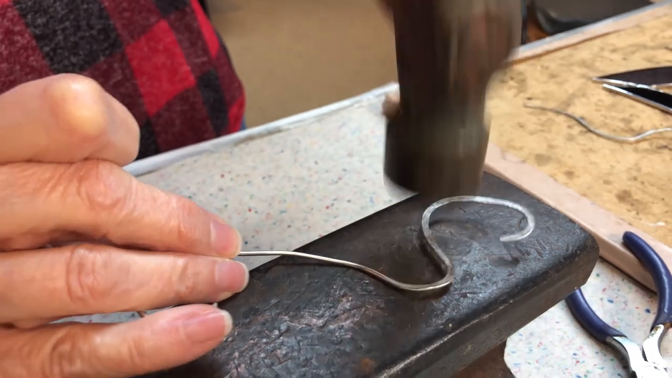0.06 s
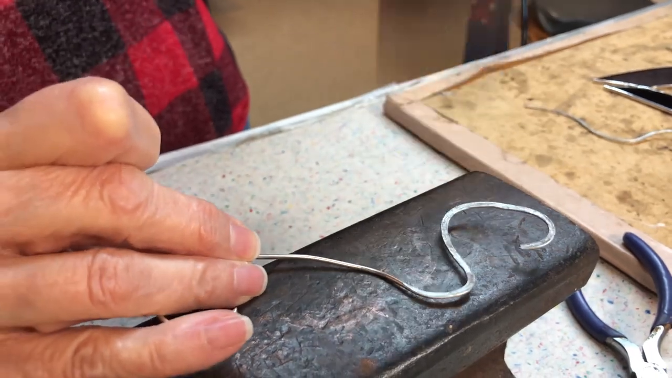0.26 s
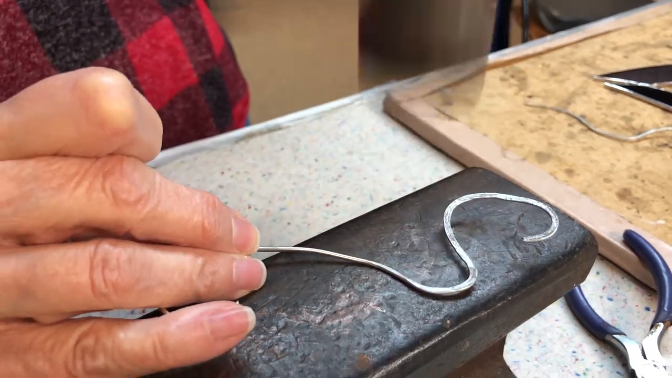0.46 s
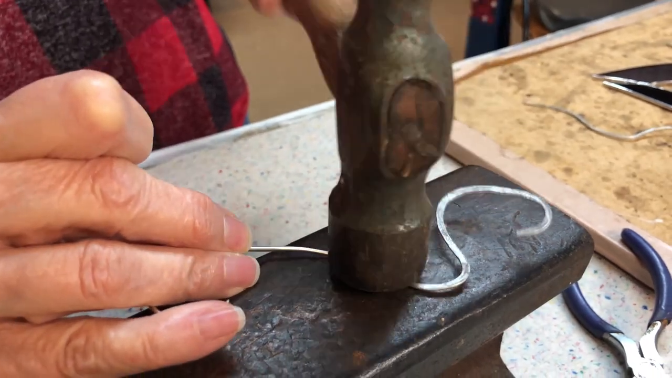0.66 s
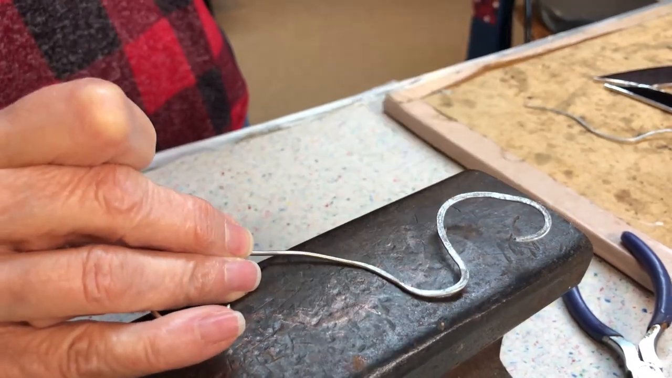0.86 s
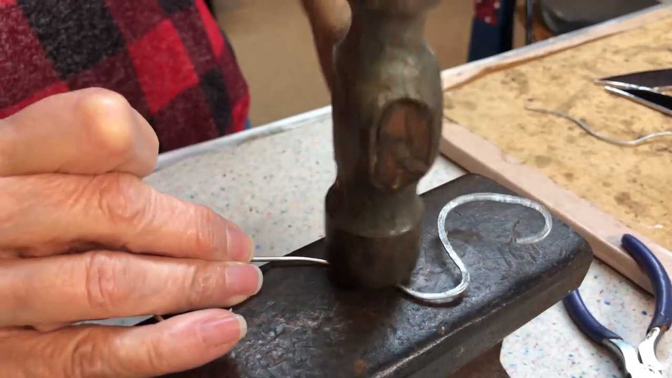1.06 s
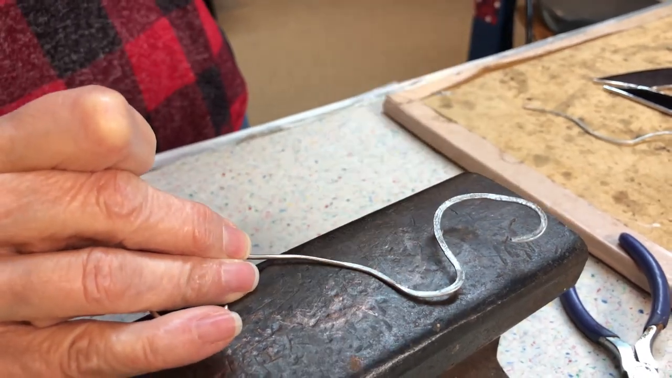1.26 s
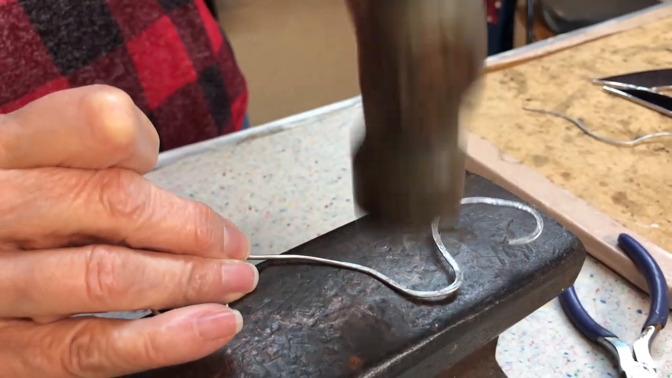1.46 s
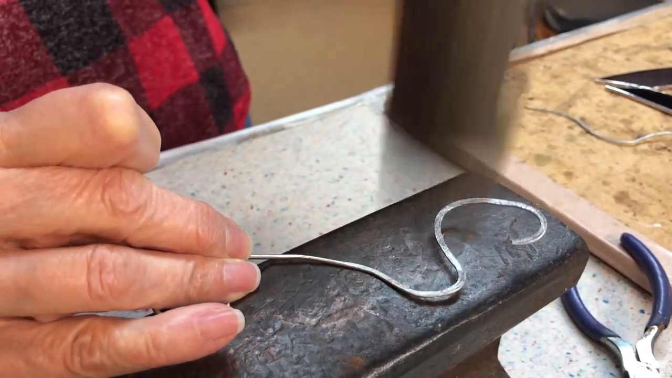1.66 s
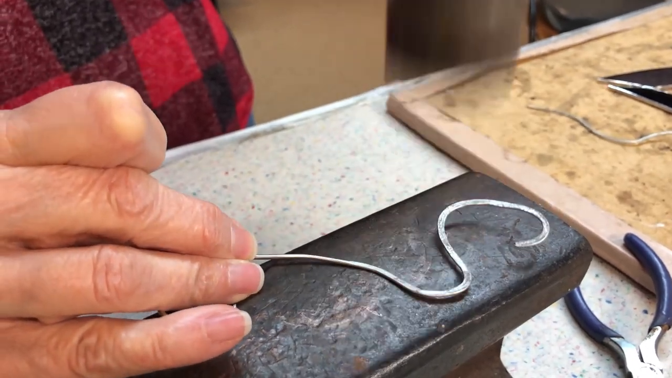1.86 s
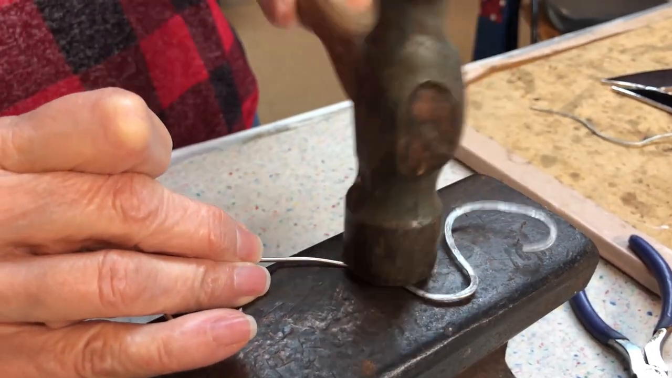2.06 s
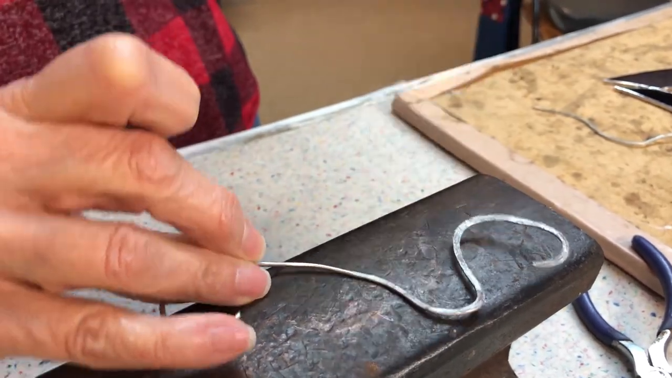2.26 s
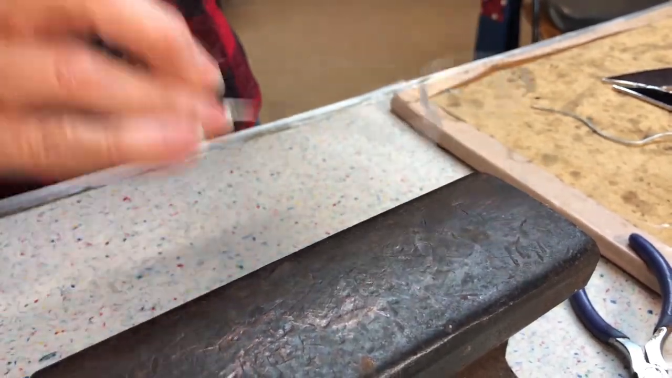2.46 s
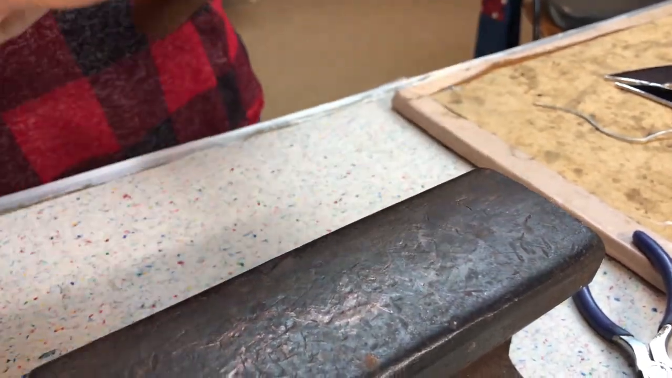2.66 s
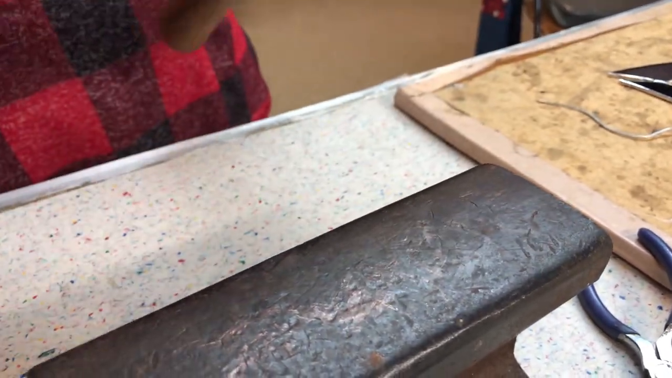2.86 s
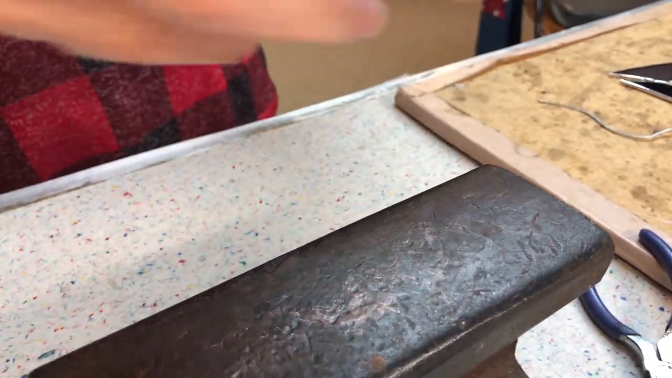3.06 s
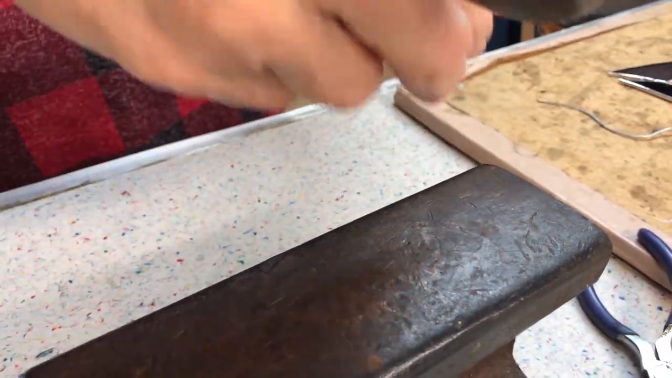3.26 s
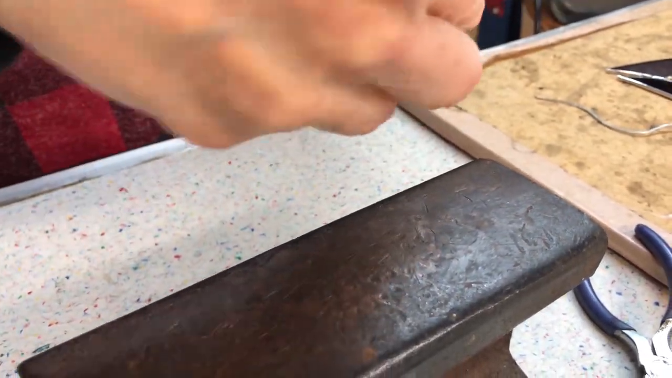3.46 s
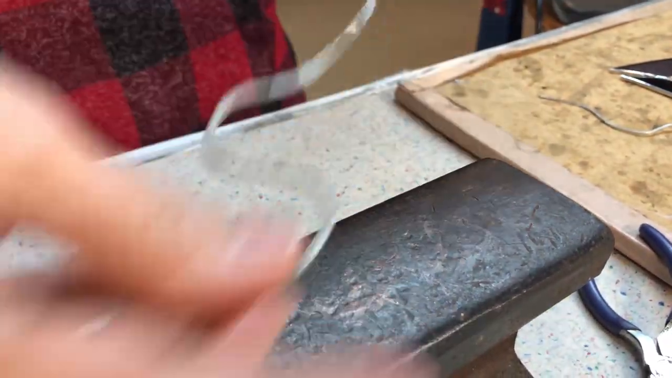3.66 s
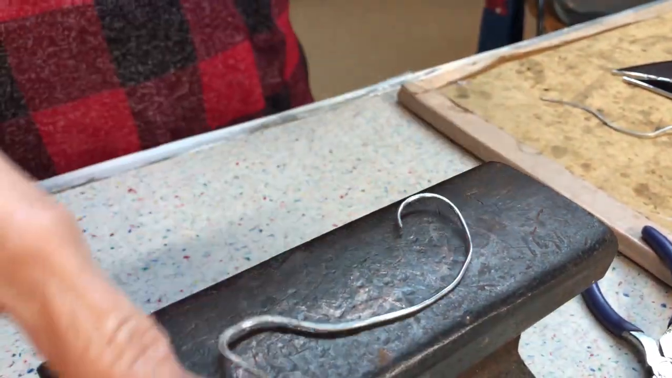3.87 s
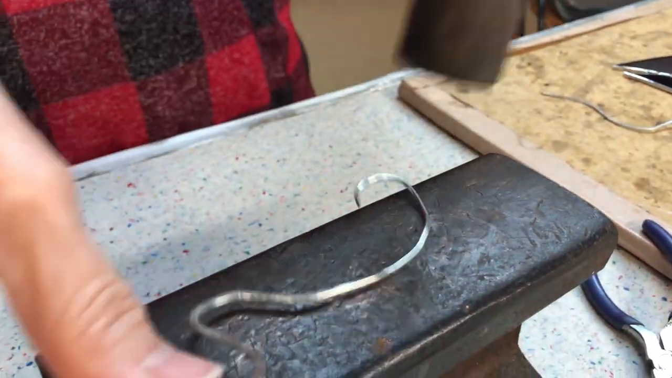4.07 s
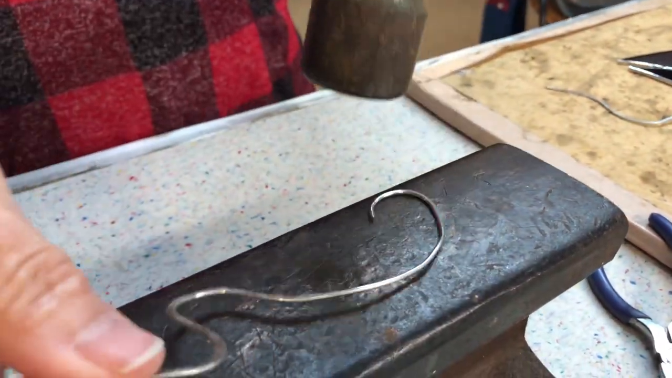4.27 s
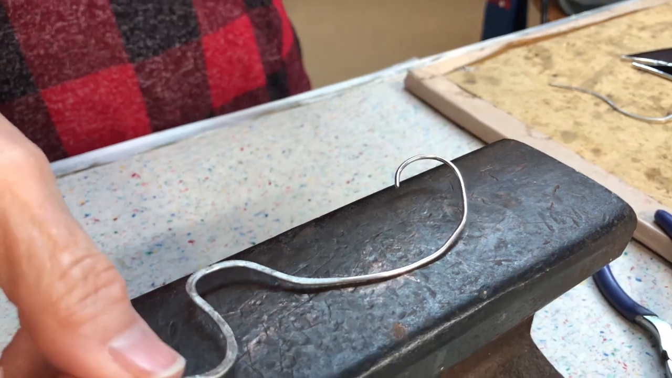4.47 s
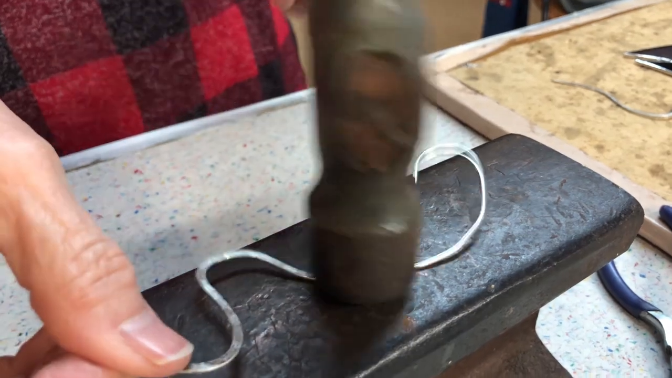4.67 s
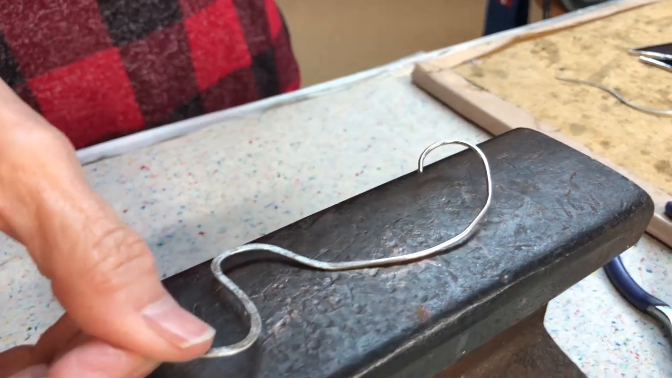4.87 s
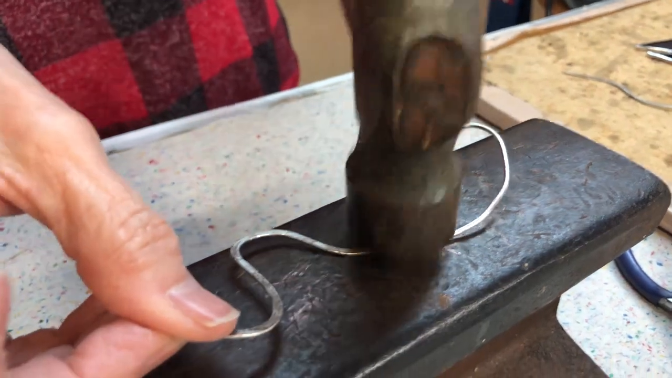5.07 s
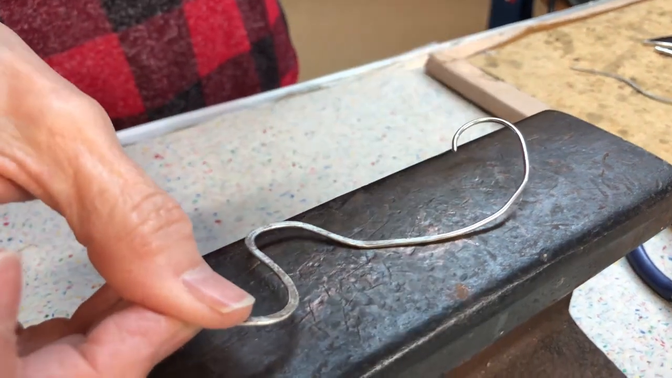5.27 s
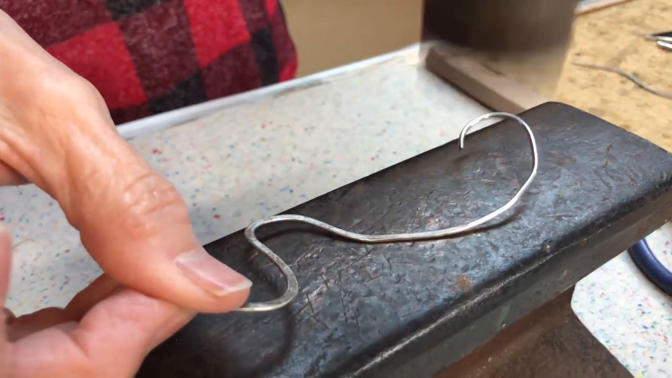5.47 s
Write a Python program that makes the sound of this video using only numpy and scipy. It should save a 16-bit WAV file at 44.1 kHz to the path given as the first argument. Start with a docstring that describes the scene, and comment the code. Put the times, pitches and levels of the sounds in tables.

```python
"""Hammering copper wire on a steel rail

A hammer flattens copper wire on a short steel rail that lies on a workbench, in a small room.
Each blow is a noise burst (the crack) with damped modes (the steel) and reverberation (the room).
The rail hops on the bench top, which booms as damped modes, and loose metal rattles in noise bursts.
In the pause the wire is lifted, turned round and slid back: ticks, gritty strokes and soft knocks.
"""
import sys
import numpy as np
from scipy import signal
from scipy.fft import rfft, irfft, next_fast_len
from scipy.io import wavfile
from scipy.ndimage import uniform_filter1d

SR = 44100
rng = np.random.default_rng(int(sys.argv[2]) if len(sys.argv) > 2 else 0)


def persist_wave(psi):
    """Save psi, clipped to +-1, as 16-bit WAV."""
    counts = np.round(np.clip(psi, -1, 1) * 32767).astype(np.int16)
    wavfile.write(sys.argv[1], SR, np.atleast_2d(counts).T)


N = 243431
T = np.arange(SR // 2) / SR  # time since a contact, s


def amp(db):
    """Level in decibels to amplitude ratio."""
    return 10 ** (np.asarray(db) / 20)


def unit(x):
    """Normalisation to an rms of 1."""
    return x / np.sqrt(np.mean(x ** 2) + 1e-20)


def along(points, hz):
    """Linear interpolation of (f/Hz, value) points over logarithmic frequency."""
    f, value = np.transpose(points)
    return np.interp(np.log(hz + 1), np.log(f + 1), value)


def fade(t, t60):
    """Exponential decay: the level falls by 60 dB in t60 seconds."""
    return np.exp(-np.log(1000) * t / t60)


def add(track, s, sound):
    """Superposition: the sound joins the track at s seconds, cut at both ends of the track."""
    start = int(round(s * SR))
    part = sound[max(-start, 0):max(N - start, 0)]
    track[max(start, 0):][:len(part)] += part


def noise(spectrum, size):
    """Spectral shaping: white noise filtered to a given spectrum, with an rms of 1."""
    hz = np.fft.rfftfreq(size, 1 / SR)
    white = rfft(rng.standard_normal(size))
    return unit(irfft(white * amp(along(spectrum, hz)), size))


def burst(spectrum, hold, t60):
    """Contact noise: it holds while the surfaces crush (hold, s), then decays exponentially."""
    grit = noise(spectrum, len(T))
    envelope = fade(np.maximum(T - hold, 0), t60)
    shaped = grit * envelope
    # equal energy for every draw of the noise
    return shaped / np.sqrt(np.sum(shaped ** 2) / np.sum(envelope ** 2))


def ring(modes, scatter_db):
    """Modal superposition: decaying sinusoids, with strengths drawn anew at each call."""
    out = np.zeros(len(T))
    for hz, db, t60 in modes:
        strength = amp(db + scatter_db * rng.standard_normal())
        out += strength * np.sin(2 * np.pi * hz * T) * fade(T, t60)
    return out


def wavering_ring(modes, depth, rate, direct, build):
    """Modes swelling as reflections arrive, with random slow modulation of level and phase."""
    hz, db, t60 = np.transpose(modes)[:, :, None]
    knots = depth * rng.standard_normal((2, len(modes), 128))  # rate: knots per second
    in_phase, across = (np.array([np.interp(T * rate, np.arange(len(k)), k) for k in part])
                        for part in knots)
    phase = 2 * np.pi * hz * T
    tones = (1 + in_phase) * np.sin(phase) + across * np.cos(phase)
    swell = 1 - (1 - direct) * np.exp(-(T / build) ** 2)  # direct: share present at once
    return swell * np.sum(amp(db) * fade(T, t60) * tones, axis=0)


# reverberation of the small room: f/Hz, T60/s
ROOM_DECAY = [(80, .42), (200, .45), (500, 0.39), (1200, 0.3), (3000, 0.25), (6500, 0.18), (9000, .18),
              (15000, 0.09)]


def echo(spectrum, build):
    """Reverberation: reflections build up (build, s), then each band decays, the treble fastest."""
    hz, t, z = signal.stft(noise(spectrum, len(T)), SR, nperseg=512)
    decay = fade(t, along(ROOM_DECAY, hz)[:, None])
    tail = signal.istft(z * decay, SR, nperseg=512)[1][:len(T)]
    return tail * (1 - np.exp(-(T / build) ** 2))


# echo spectrum that every contact excites: f/Hz, relative level/dB
ECHO_SPECTRUM = [(40, -12.5), (80, 15.5), (160, 16), (260, 11), (400, 6), (700, 3), (1200, -2.5),
                 (2050, -0.5), (2700, -5.5), (5500, -4.5), (8200, -4), (11000, -7.5), (15200, -17.5),
                 (17000, -37)]


def contacts(events, spectrum, hold, t60, gain_db, echo_db):
    """Impact excitation: small short bursts, each exciting the same weak reverberation."""
    out = np.zeros(N)
    room = amp(echo_db) * echo(ECHO_SPECTRUM, build=.008)
    for s, db in events:
        add(out, s, amp(db + gain_db) * (burst(spectrum, hold, t60) + room))
    return out


# spectrum of the rumble: f/Hz, relative level/dB
RUMBLE_SPECTRUM = [(15, -21.5), (30, -14.5), (76, 2), (150, 1.5), (236, -3.5), (416, -11), (775, -25),
                   (1200, -34), (2200, -37), (4600, -40), (16000, -46.5)]
# spectrum of the hands and sleeves: f/Hz, relative level/dB
SLEEVE_SPECTRUM = [(200, -1), (700, 3.5), (1500, -3), (4000, -10), (10000, -13), (15500, -15),
                   (17000, -29.5)]
# sleeve hiss at its usual level (dB), at its faintest (dB), and the time to change over (s)
USUAL_DB, FAINT_DB, SETTLE_S = -73.5, -86, 0.65
FAINT_FROM_S, FAINT_TO_S = 2.7, 2.84  # the sleeve hiss is faintest here


def room_tone(rumble_db):
    """Stationary noise: a steady low rumble; a faint hiss of hands and sleeves sinks once."""
    t = np.arange(N) / SR
    turns = [FAINT_FROM_S - SETTLE_S, FAINT_FROM_S, FAINT_TO_S, FAINT_TO_S + SETTLE_S]
    rustle_db = np.interp(t, turns, [USUAL_DB, FAINT_DB, FAINT_DB, USUAL_DB])
    rumble = amp(rumble_db) * noise(RUMBLE_SPECTRUM, N)
    return rumble + amp(rustle_db) * noise(SLEEVE_SPECTRUM, N)


# soft knocks of handling: t/s, relative level/dB, resonance f/Hz
KNOCKS = [(2.492, -58, 1400), (2.737, -63, 2200), (2.95, -55, 1198), (3.516, -50.5, 1800),
          (3.785, -56.5, 2380), (4.059, -49.5, 1000)]
# spectrum of a knock: f/Hz, relative level/dB
KNOCK_SPECTRUM = [(200, -10), (800, -2), (1300, 2), (2000, 1), (2700, -4), (4000, -10), (9000, -14),
                  (16000, -31)]


def knocks(gain_db, tone_db, ring_t60, echo_db):
    """Resonance: dull contacts, each exciting one short mode of the thing touched."""
    events = [(s, db) for s, db, _ in KNOCKS]
    out = contacts(events, KNOCK_SPECTRUM, hold=0.0011, t60=0.018, gain_db=gain_db, echo_db=echo_db)
    for s, db, hz in KNOCKS:
        add(out, s, ring([(hz, db + tone_db, ring_t60)], scatter_db=0.5))
    return out


# the wire touching the rail: t/s, relative level/dB
TICKS = [(3.8926, -37.5), (4.0664, -47.5), (4.0806, -39), (4.1385, -53.5), (4.1949, -55), (4.2138, -53.5),
         (4.3221, -51.5)]
# spectrum of wire on steel, for ticks and strokes: f/Hz, relative level/dB
WIRE_CONTACT_SPECTRUM = [(800, -35.5), (2100, -3), (5000, -4.5), (7800, -4), (9500, 1.5), (12500, 0.5),
                         (15500, -1.5), (17000, -24.5)]


def ticks(gain_db, echo_db):
    """Light impact: the wire touches the rail in brief, bright bursts."""
    return contacts(TICKS, WIRE_CONTACT_SPECTRUM, hold=0.0019, t60=0.011,
                    gain_db=gain_db, echo_db=echo_db)


# the wire sliding on the rail: t/s, length/s, relative level/dB
DRAGS = [(3.509, 0.032, -64.5), (3.95, 0.034, -47.5), (4.105, 0.038, -62.5), (4.286, 0.031, -62.5)]


def drags(gain_db, grain_db):
    """Friction noise: the wire scrapes over pitted steel, whose grain modulates short strokes."""
    out = np.zeros(N)
    for s, length, db in DRAGS:
        stroke = np.minimum(T / 0.006, 1) * fade(np.maximum(T - length, 0), 0.098)
        pits = unit(uniform_filter1d(rng.standard_normal(len(T)), size=60))
        scrape = unit(amp(grain_db * pits) * noise(WIRE_CONTACT_SPECTRUM, len(T)))
        add(out, s, amp(db + gain_db) * stroke * scrape)
    return out


# the bent wire's own modes: f/Hz, relative level/dB, T60/s
WIRE_MODES = [(2050, 1, .14), (2700, 0, .1), (3600, -2, .08), (5300, 0, .1), (7750, 2, .05),
              (10400, -1, .1), (12900, -4, .1), (14000, -5, .1)]


def wire(touch):
    """Convolution: every touch also excites the wire's modes, faintly, for the fingers damp it."""
    modes = ring(WIRE_MODES, scatter_db=0.5)
    response = modes / np.linalg.norm(modes)
    return touch + amp(-14) * signal.fftconvolve(touch, response)[:N]


# hammer blows; the spot struck decides how strongly each group of steel modes rings:
# t/s, crack level/dB, thud level/dB, delay of the hardest rattle/s,
# low ping level/dB, middle ring level/dB, high ring level/dB (all levels relative)
BLOWS = [(-0.0137, -15.5, -21, 0.026, -33, -19, -27), (0.338, -16, -19.5, .025, -36.5, -23, -19.5),
         (0.6892, -14, -20, 0.025, -42.5, -26.5, -6.5), (1.0319, -14.5, -19, 0.024, -24.5, -26.5, -12),
         (1.3734, -14, -20, 0.026, -27.5, -12, -13.5), (1.726, -15, -23.5, .0267, -26, -9, -20),
         (2.0808, -15.5, -23, .0264, -28.5, -19.5, -11), (4.6886, -13.5, -19.5, 0.042, -41.5, -24.5, -19.5),
         (5.0466, -15.5, -20, .043, -38, -27.5, -25), (5.3763, -15.5, -20, 0.039, -22.5, -32, -29)]
# spacing of contacts (s), drop from the hardest (dB), random scatter of strength (dB)
RATTLE_GAP_S, RATTLE_LOSS_DB, RATTLE_SCATTER_DB = .016, 7, 1


def chatter():
    """Repeated impact: each thud shakes loose metal, one hard contact between two lighter ones."""
    events = []
    for s, _, thud_db, delay, *_ in BLOWS:
        for k in (-1, 0, 1):
            db = thud_db - abs(k) * RATTLE_LOSS_DB + RATTLE_SCATTER_DB * rng.standard_normal()
            events.append((s + delay + k * RATTLE_GAP_S, db))
    return events


# spectrum of a rattle: f/Hz, relative level/dB
RATTLE_SPECTRUM = [(300, -12.5), (1000, -8), (2000, -4), (3000, -17.5), (6500, -14.5), (7500, 1), (9000, 0),
                   (11000, -16), (14000, -18.5), (15200, -9), (17000, -30.5)]


def rattles(gain_db, echo_db):
    """Impact noise: each chattering contact of the loose metal is a short burst."""
    return contacts(chatter(), RATTLE_SPECTRUM, hold=0.002, t60=0.013,
                    gain_db=gain_db, echo_db=echo_db)


# the rail landing on the bench after a blow: delay/s, contact time/s, relative level/dB
HOPS = [(.0041, 0.00066, -3), (.0095, 0.0021, -14), (0.0164, 0.0018, -1.5), (0.0292, 0.0035, -9.5),
        (0.041, 0.0025, -9.5)]
# bench-top modes: f/Hz, relative level/dB, T60/s
BENCH_MODES = [(67.8, -3, 0.26), (87.5, -4.5, 0.23), (130.95, -2.5, 0.38), (145, -5.5, .34),
               (196.5, 1.5, 0.16), (214, -8, 0.18), (242, -7, .25), (302, -4, .2), (354, -5, 0.29),
               (376.5, -7, 0.37), (554, -11.5, 0.35)]


def bench(hop_db, boom_db, boom_delay, swell):
    """Forced and free vibration: each landing of the rail pushes the top, which booms on."""
    out = np.zeros(N)
    for s, _, db, *_ in BLOWS:
        for delay, contact, level in HOPS:
            u = (T - delay) / contact
            # the radiated pressure is the curvature of a smooth push
            push = (1 - u ** 2) * np.exp(-u ** 2 / 2)
            add(out, s, amp(db + level + hop_db) * push)
        boom = ring(BENCH_MODES, scatter_db=1) * (1 - np.exp(-T / swell))
        add(out, s + boom_delay, amp(db + boom_db) * boom)
    return out


# spectrum of the crack: f/Hz, relative level/dB
CRACK_SPECTRUM = [(100, -17), (400, -9.5), (900, -17.5), (1300, -5), (1900, 0), (2700, -5), (3700, -5.5),
                  (5200, -9), (6600, -3.5), (8200, -17), (9600, -8), (11000, -15), (15000, -12.5),
                  (17000, -28.5)]
# modes of hammer head and rail that die almost at once: f/Hz, relative level/dB, T60/s
CLANK_MODES = [(1878, 1.5, 0.014), (2290, -6, 0.018), (3120, -6, 0.015), (3770, -12, 0.022),
               (6500, -9.5, .016), (6804, -4, .016), (9750, -5, 0.027)]
# steel modes that every blow rings about alike: f/Hz, relative level/dB, T60/s
STEEL_MODES = [(1557, -36, .2), (2044, -37, .26), (2099, -32, .24), (3131, -39, .2), (3488, -39, .18),
               (3898, -41, .2), (4070, -41, .18), (5655, -40, .2), (7284, -33, .14), (8215, -37, .12),
               (9742, -31, .19), (12785, -38, .12), (14600, -44, .13), (14829, -29, .16)]
# main steel modes, in the groups that ring together: f/Hz, relative level/dB, T60/s
LOW_PING = [(2038, 0, .22)]
MIDDLE_RING = [(5647, -15, .16), (7928, 0, .14)]
HIGH_RING = [(9735, 0, .115), (15106, -11.5, .2)]


def hammer(crack_db, clank_db, echo_db, steel_db):
    """Impact and modal response: steel on wire on steel cracks, rings and excites the room."""
    out = np.zeros(N)
    walls = echo(ECHO_SPECTRUM, build=0.018)  # reflections that stay the same from blow to blow
    for s, db, _, _, *group_db in BLOWS:
        crack = amp(crack_db) * burst(CRACK_SPECTRUM, hold=0.0014, t60=0.013)
        onset = 1 - np.exp(-T / 0.00044)
        clank = amp(clank_db) * ring(CLANK_MODES, scatter_db=1.0) * onset
        room = amp(echo_db) * (walls + echo(ECHO_SPECTRUM, build=0.024))
        struck = []
        for group, strength in zip((LOW_PING, MIDDLE_RING, HIGH_RING), group_db):
            struck += [(hz, level + strength, t60) for hz, level, t60 in group]
        steel = wavering_ring(struck + list(STEEL_MODES), depth=.25, rate=70, direct=.25, build=.016)
        add(out, s, amp(db) * (crack + clank + room) + amp(steel_db) * steel)
    return out


def scene():
    """Superposition of room tone, handling, rattles, bench and blows."""
    background = room_tone(rumble_db=-60.5)
    touches = ticks(gain_db=-8, echo_db=-14.0) + drags(gain_db=-6.5, grain_db=3.0)
    soft_knocks = knocks(gain_db=-8.5, tone_db=-8.5, ring_t60=0.041, echo_db=-20)
    handling = wire(touches) + soft_knocks
    loose_metal = rattles(gain_db=-5, echo_db=-27.5)
    thuds = bench(hop_db=10, boom_db=-4, boom_delay=.014, swell=.004)
    blows = hammer(crack_db=0, clank_db=1.5, echo_db=-8.5, steel_db=-2)
    return (background + handling + loose_metal + thuds + blows)[None]


TOP_HZ = 16000  # band limit


def record(dry):
    """Saturation and band limiting: the highest peaks are rounded, then a steep low-pass acts."""
    rounded = dry / (1 + (dry / .68) ** 6) ** (1 / 6)
    size = next_fast_len(N + SR // 2)
    low_pass = 1 / (1 + (np.fft.rfftfreq(size, 1 / SR) / TOP_HZ) ** 80)
    return irfft(rfft(rounded, size) * low_pass, size)[..., :N]


dry = scene()
out = record(dry)
persist_wave(out)
```